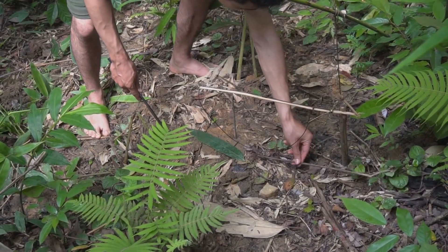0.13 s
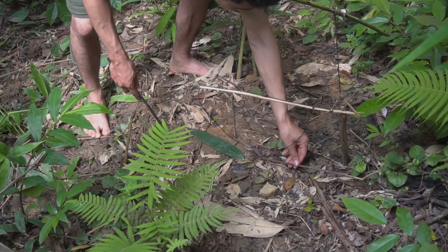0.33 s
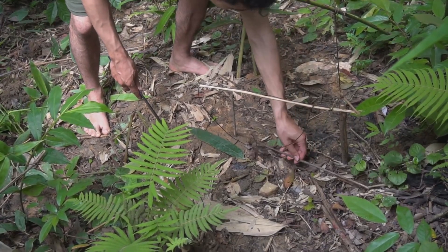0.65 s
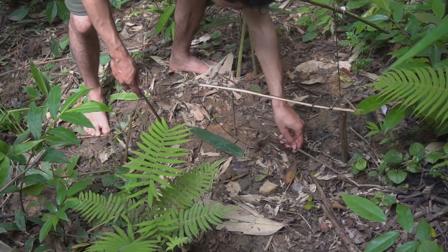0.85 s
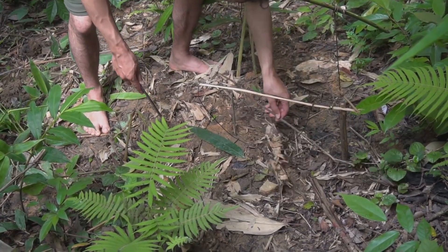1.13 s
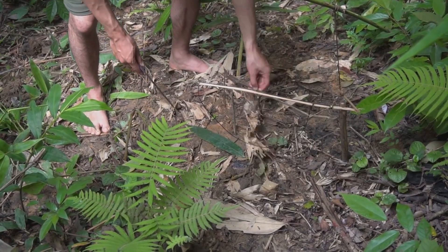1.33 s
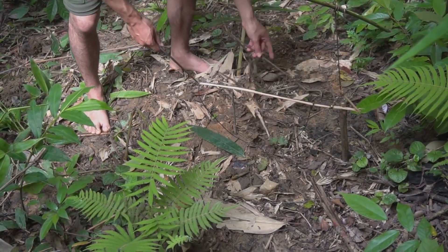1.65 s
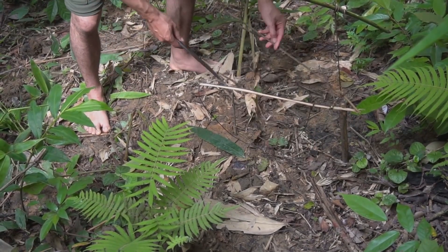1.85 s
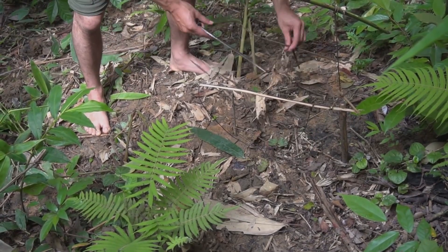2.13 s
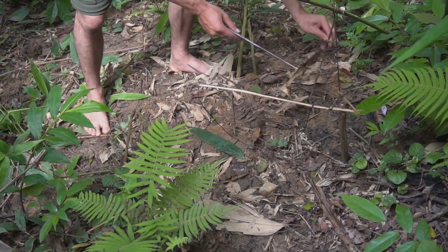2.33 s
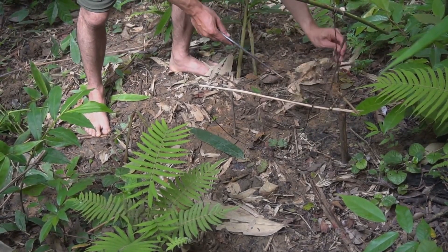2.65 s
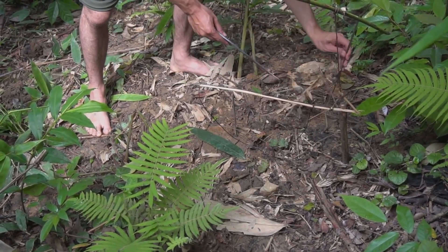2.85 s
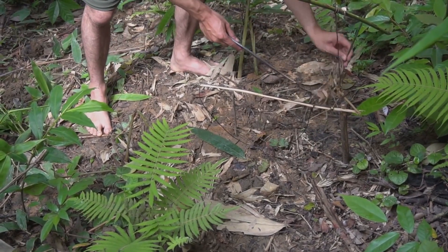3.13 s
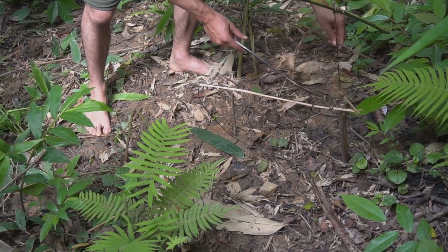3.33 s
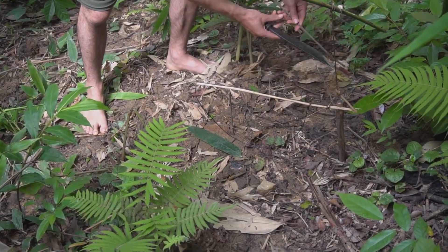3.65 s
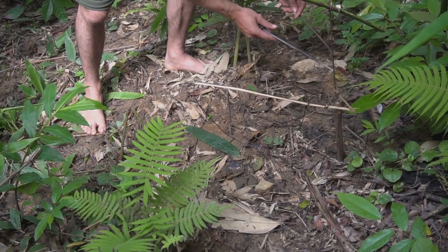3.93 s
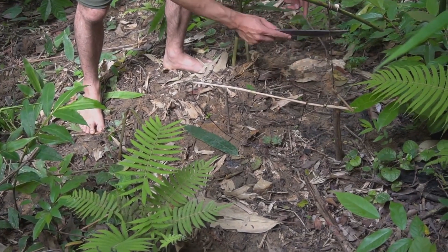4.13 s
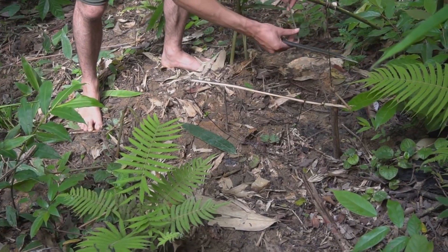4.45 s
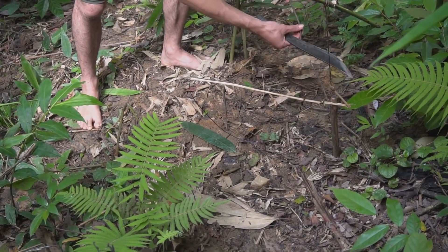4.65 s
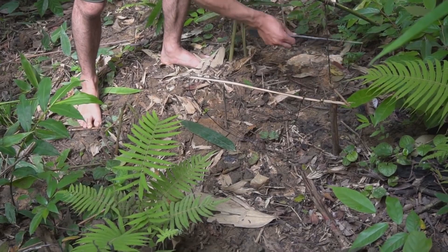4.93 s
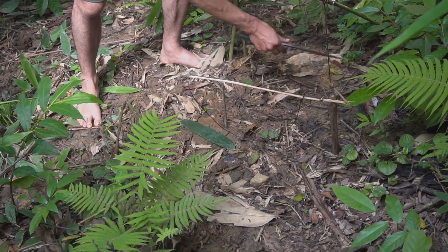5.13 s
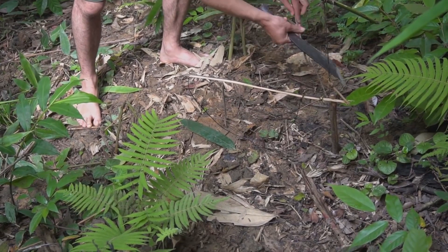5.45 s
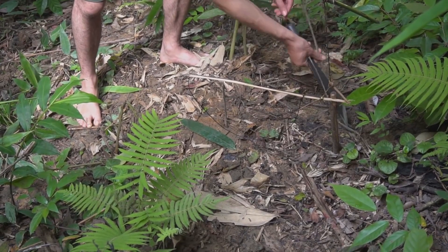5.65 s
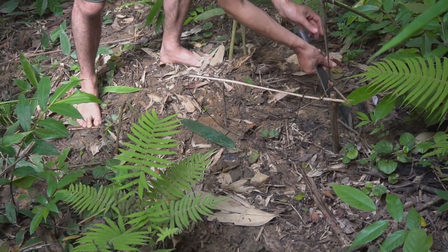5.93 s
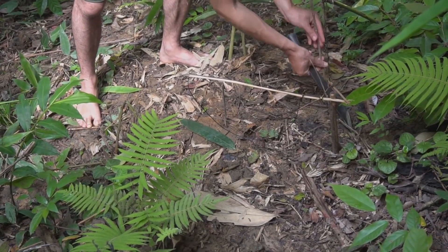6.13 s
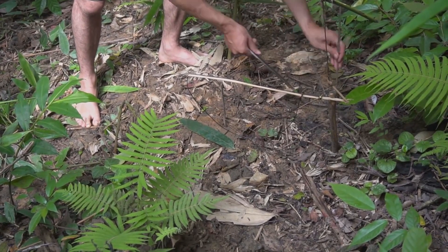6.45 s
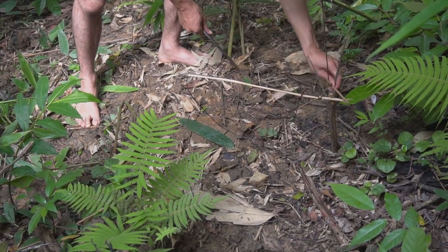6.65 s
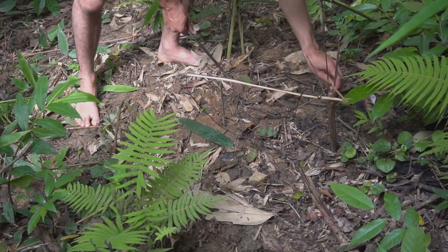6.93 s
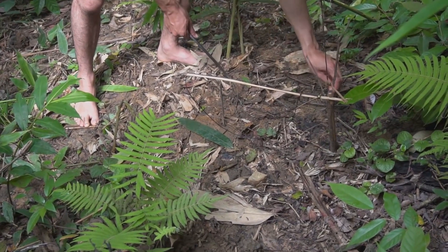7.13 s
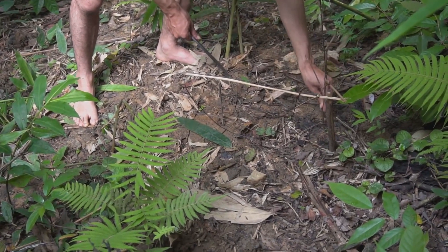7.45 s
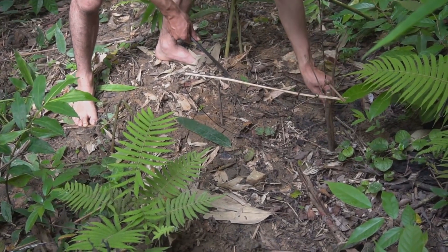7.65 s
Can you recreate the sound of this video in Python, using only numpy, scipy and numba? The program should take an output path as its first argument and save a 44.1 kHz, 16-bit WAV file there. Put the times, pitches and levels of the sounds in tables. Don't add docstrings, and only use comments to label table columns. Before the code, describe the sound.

A dense, shrill cicada chorus fills a tropical forest, several near singers swelling and rising about once a second, leaning slightly left. Close by, hands crunch dry leaves and snap twigs, with firm stem knocks around two seconds. A blade brushes twigs with short bright scrapes, and the loudest crack comes near five seconds. Later the handling thins and a far frog gives soft notes. Stereo microphone a few steps away, outdoors.

```python
import sys
import numpy as np
from scipy import signal
from scipy.fft import rfft, irfft
from scipy.io import wavfile
from scipy.ndimage import uniform_filter1d
from numba import njit

SR = 44100
rng = np.random.default_rng(int(sys.argv[2]) if len(sys.argv) > 2 else 0)


def put_to_file(sound):
    columns = np.atleast_2d(sound).T
    safe = np.clip(columns, -1, 1)
    whole_steps = np.round(safe * 32767)
    wavfile.write(sys.argv[1], SR, whole_steps.astype(np.int16))


def elevation(decibels):
    levels = np.asarray(decibels, float)
    return 10 ** (levels / 20)


N = 343980
TIME = np.arange(N) / SR
WAVER_DB = .5


def level(x, db):
    return x * elevation(db) / np.sqrt(np.mean(x ** 2))


def columns(table):
    s, *values = np.transpose(table)
    return [np.interp(TIME, s, v) for v in values]


def colour(x, points):
    hz, db = np.transpose(points)
    f = np.maximum(np.fft.rfftfreq(x.shape[-1], 1 / SR), 1)
    gain = elevation(np.interp(np.log(f), np.log(hz), db))
    return irfft(rfft(x) * gain, x.shape[-1])


def pan(x, db):
    return x * elevation(np.array([db, -db]).reshape(2, -1) / 2)


def walk(rate):
    k = int(SR / rate)
    steps = np.repeat(rng.standard_normal(N // 100), k)[:N]
    return 1.02 * uniform_filter1d(uniform_filter1d(steps, k), k)


def bump(s, length):
    return np.abs(np.sin(np.pi * np.clip((TIME - s) / length, 0, 1)))


def swells(start, db, rise, hold, fall):
    coarse = TIME[::64]
    t = coarse - np.reshape(start, (-1, 1))
    hold = np.reshape(hold, (-1, 1))
    slope_db = 20 * np.minimum(np.minimum(t / rise - 1, (rise + hold - t) / fall), 0)
    power = np.sum(elevation(2 * (slope_db + np.reshape(db, (-1, 1)))), axis=0)
    return np.interp(TIME, coarse, np.sqrt(power))


@njit
def svf(x, hz, width):
    y, b, l = np.empty(len(x)), 0., 0.
    for i in range(len(x)):
        g, k = np.tan(np.pi * hz[i] / SR), width / hz[i]
        v = (b + g * (x[i] - l)) / (1 + g * (g + k))
        b, l, y[i] = 2 * v - b, l + 2 * g * v, k * v
    return y


@njit
def follow(x, attack, release):
    y, e = np.empty(len(x)), 0.
    for i in range(len(x)):
        e += (x[i] - e) * (attack if x[i] > e else release)
        y[i] = e
    return y


def ring(x, hz, width_hz):
    hz = hz + 0 * TIME
    return svf(svf(x, hz, 1. * width_hz), hz, 1. * width_hz)


def tymbal(rate_hz, uneven):
    timing, loudness = rng.standard_normal((N // 30, 2)).T
    at = np.cumsum(SR / rate_hz * np.maximum(1 + uneven * timing, .1))
    inside = at < N - 2
    size, at = elevation(1.63 * loudness)[inside], at[inside]
    whole, part = at.astype(int), at % 1
    return np.bincount(whole, size * (1 - part), N) + np.bincount(whole + 1, size * part, N)


def forest(x, t60_s, wet_db, sway_hz=8.):
    t = TIME[:SR // 3]
    scatter = rng.standard_normal((3, 2, len(t))) * elevation(-60 * t / t60_s)
    scatter *= elevation(wet_db) / np.sqrt(np.sum(scatter ** 2, axis=2, keepdims=True))
    turn = 2 * np.pi * sway_hz * TIME + 2.0 * walk(2.003)
    share = np.cos(turn + np.arange(3)[:, None] * 2 * np.pi / 3) * np.sqrt(2 / 3)
    return x + signal.oaconvolve((x * share)[:, None], scatter, axes=2).sum(axis=0)[:, :N]


# frequency in Hz, level in dB per Hz.
AIR_SPECTRUM = [(12, -44), (20, -18), (91, -2.5), (255, -7.5), (527, -9), (718, -5), (897, -13), (1190, -6),
                (1810, -6.5), (2140, -3.5), (2820, 0), (4060, -8), (8890, -24.5), (12800, -30),
                (16000, -30)]
# frequency in Hz, side minus mid in dB.
AIR_WIDTH = [(60, -26), (110, -13), (200, -8.5), (380, -4.5), (700, -8.5), (1290, -10), (2380, -6),
             (4400, -2.5), (8120, 4.5), (15000, -2)]


def air():
    mid, side = colour(rng.standard_normal((2, N)), AIR_SPECTRUM)
    side = colour(side, [(25, -24)] + list(AIR_WIDTH))
    side = colour(side, [(30, -8), (60, 0.5)])
    hum = level(ring(rng.standard_normal(N), 77.4, 30), -57.0)
    return level(np.array([mid + side, mid - side]), -37.0) * elevation(1.0 * walk(3.18)) + hum


# time in seconds, level of the upper and of the lowest singers in dB.
CHORUS_LEVEL = [(0, -41, -41), (.6, -37.5, -61), (1.1, -38, -60), (2.1, -47, -48.5), (3.0, -49, -47),
                (3.8, -41, -43.5), (4.6, -45, -43.5), (5.1, -35.5, -56), (5.5, -48, -46), (5.9, -42, -44),
                (6.5, -37, -55), (7.2, -37.5, -57), (7.8, -34.5, -43)]
# frequency in Hz, width in Hz, level in dB.
CHORUS_RESONANCES = [(2400, 550, 0), (2750, 500, -1)]


def chorus():
    db, low_db = columns(CHORUS_LEVEL)
    clicks = sum(tymbal(hz, .3) for hz in (390., 470., 610.))
    upper = sum(elevation(g + 1.0 * walk(5.4)) * level(ring(clicks, hz, width), 0)
                for hz, width, g in CHORUS_RESONANCES)
    lowest = level(ring(clicks, 2140, 246), 0) * elevation(low_db - 4.5)
    far = level(upper, 0) * elevation(db - 7.5) + lowest
    return pan(forest(far, t60_s=0.19, wet_db=5.0), -2.2)


# time in seconds, level in dB, wing resonance in Hz.
KATYDID_COURSE = [(0, -64, 13450), (.75, -61, 13300), (1.5, -65, 13200), (3.0, -65, 13000),
                  (4.3, -73, 13100), (5.5, -78, 13100), (7.8, -80, 13100)]


def katydid():
    db, hz = columns(KATYDID_COURSE)
    hum = ring(tymbal(900., .3), hz + 90 * walk(5), 1400)
    hum = level(hum, 0) * elevation(db - 4.5 + 2.2 * walk(7.1))
    return forest(hum, t60_s=.15, wet_db=12.5)


# start in seconds, length in seconds, level in dB, pitch in Hz.
FROG_NOTES = [
    (5.84, .07, -52, 1540),
    (6.42, .07, -43, 1550),
    (7.297, .055, -42, 1590),
    (7.4, .06, -44, 1530),
]


def frog():
    notes = sum(elevation(db) * bump(s, length) * np.sin(2 * np.pi * hz * TIME) for s, length, db, hz in FROG_NOTES)
    return pan(notes, -1.5)


def cricket():
    trill = level(ring(tymbal(700., .3), 7700, 500), -58) * bump(.42, .2)
    return forest(trill, t60_s=.12, wet_db=3.5)


# time in seconds, level in dB.
EVEN_LEVEL = [(0, -70), (1.8, -69), (1.9, -48), (2.1, -47), (2.45, -43), (2.9, -43.5), (3.3, -42.5),
              (3.6, -37), (3.9, -46), (4.9, -52), (5.1, -46), (5.5, -48), (5.8, -41.5), (6.1, -47),
              (6.6, -49), (7.0, -46), (7.4, -46), (7.8, -48)]


def even_cicada():
    clicks = tymbal(252.8, .006)
    song = level(ring(clicks, 3760, 1400), 0) * elevation(columns(EVEN_LEVEL)[0] + 1.8 * walk(9))
    return pan(forest(song, t60_s=.08, wet_db=2.5, sway_hz=3.), 2.9)


# start in seconds, length in seconds, level in dB.
CLEAR_MOMENTS = [(0.117, 0.085, -34), (.16, 0.085, -38), (.99, 0.13, -46), (1.13, 0.074, -42),
                 (1.227, 0.083, -41), (1.846, 0.065, -36), (1.93, 0.12, -38), (2.847, .092, -35.5),
                 (2.866, .11, -32.5), (3.047, 0.13, -28.5), (3.05, .22, -38), (3.06, 0.13, -39),
                 (3.22, 0.11, -32.5), (3.22, 0.2, -34), (3.24, 0.074, -38), (3.4, .09, -33.5),
                 (3.419, 0.25, -40), (3.438, 0.12, -34), (3.55, 0.096, -35), (3.603, .08, -35),
                 (3.75, 0.072, -34), (4.16, .11, -38), (4.95, .15, -37), (5.2, .09, -41),
                 (5.248, 0.094, -34.5), (5.614, 0.15, -34), (5.67, 0.12, -33.5), (5.877, 0.12, -31.5),
                 (5.9, 0.22, -35), (6.44, .12, -31.5), (6.47, .12, -31), (6.62, .11, -39), (7.3, 0.11, -34),
                 (7.372, 0.11, -35), (7.46, 0.1, -30.5), (7.477, .1, -34), (7.73, 0.11, -37)]
CLEAR_PITCHES = (3950, 3590, 3280, 4070, 4170, 3285, 3280, 4305, 4050, 4050, 4304, 3535, 3540, 4055, 3797,
                 3530, 3790, 4040, 3525, 3270, 4250, 3850, 3790, 3280, 3910, 3320, 3820, 3280, 3775, 3670,
                 3250, 3730, 3270, 3760, 3270, 3920, 3250)


def clear_harmonics():
    flutter = .7 * walk(40)
    phases = 0.71 * rng.standard_normal((40, 2, 1))
    clear = sum(elevation(db) * bump(s, length) * np.sin(2 * np.pi * hz * TIME + phase + flutter)
                for (s, length, db), hz, phase in zip(CLEAR_MOMENTS, CLEAR_PITCHES, phases))
    return pan(clear * elevation(2.2 * walk(45)), 3.4)


# start in seconds, length in seconds, level in dB.
SHRILL_CALLS = [
    (2.3, 0.49, -61),
    (3.75, 0.77, -56.5),
    (5.197, 0.47, -51),
    (6.2, 0.51, -56.5),
    (6.95, .3, -59),
    (7.4, .4, -53.5),
]


def shrill(clicks):
    start, length, db = np.transpose(SHRILL_CALLS)
    return level(ring(clicks, 6260, 1100), 0) * swells(start, db, rise=0.13, hold=length, fall=0.26)


# start in seconds, length in seconds, level in dB.
WHISTLE_CALLS = [(.08, 0.18, -49), (0.267, 0.19, -44.5), (.5, 0.069, -49), (1.37, 0.19, -45.5),
                 (1.616, 0.073, -47.5), (2.55, 0.34, -60), (3.55, 0.44, -55), (5.95, .2, -54),
                 (7.05, 0.17, -51)]


def whistles(clicks, others):
    start, length, db = np.transpose(WHISTLE_CALLS)
    tone = ring(clicks, 4740, 300) + elevation(3.0) * ring(others, 4880, 300) + elevation(-5.0) * ring(clicks, 5360, 850)
    return level(tone, 0) * swells(start, db, rise=0.047, hold=length, fall=.08)


# time in seconds, gain in dB.
ABDOMEN_THROBS = [(2.12, 0), (2.25, -10), (2.4, -1.5), (2.72, 1), (2.9, 4), (3.14, 1), (3.36, 1), (3.55, 4),
                  (3.82, 3), (4.1, 2), (4.28, 2.5), (4.53, 3.5), (4.7, 3.5), (4.8, 5), (5.1, 4),
                  (5.29, 2.5), (5.48, 7), (5.74, -2), (6.0, 2.5), (6.1, 2.5), (6.25, 1.5), (6.5, 2),
                  (6.73, 4), (6.9, 2), (7.08, 5.5), (7.18, 6.5), (7.38, 1.5), (7.5, 3), (7.7, 2)]


def throbs():
    coarse = TIME[::64]
    gain_db = sum(db * np.exp(-((coarse - s) / 0.065) ** 2) for s, db in ABDOMEN_THROBS)
    return np.interp(TIME, coarse, gain_db)


# time in seconds, level in dB, left minus right in dB.
DRONE_COURSE = [(0, -37, 4), (.2, -41.5, 6), (.45, -68, 1), (.8, -43, 0), (1.4, -42.5, 5), (1.8, -82, 2.5),
                (1.89, -43, 9), (2.2, -39, 5), (2.5, -36.5, 4.5), (3.4, -40, 3), (4.9, -35.5, 5.5),
                (5.08, -29, -2), (5.5, -34.5, -1), (6.3, -32, -0.5), (6.9, -38, 2), (7.15, -34.5, 1),
                (7.45, -33, -2), (7.8, -38, -1.5)]


def drone(clicks, throb_db):
    db, pan_db = columns(DRONE_COURSE)
    song = level(ring(clicks, 3265, 1270) + elevation(-9.0) * ring(clicks, 3290, 350), 0)
    song = song * elevation(db - 4.0 + 0.062 * throb_db + WAVER_DB * walk(8.3))
    return pan(forest(song, t60_s=0.36, wet_db=4.5), pan_db)


# time in seconds, level in dB, resonance in Hz.
SONG_COURSE = [(0, -60, 3300), (1.8, -72.5, 3320), (1.88, -38, 3300), (2.03, -34, 4010), (2.5, -34.5, 3950),
               (3.0, -41, 3850), (3.8, -33, 3850), (4.5, -36.5, 3820), (5.0, -34, 3730), (5.6, -40, 3770),
               (6.1, -36.5, 3770), (6.6, -34.5, 3730), (6.9, -41.5, 3740), (7.3, -37.5, 3750),
               (7.8, -36.5, 3730)]


def steady_cicada(clicks, throb_db):
    db, hz = columns(SONG_COURSE)
    song = level(ring(clicks, hz, 1030) + elevation(-8.0) * ring(clicks, hz, 410), 0)
    return song * elevation(db - 3.5 + throb_db + WAVER_DB * walk(10))


# start in seconds, level in dB, level of the stretched abdomen in dB.
RISING_PHRASES = [
    (-.18, -30.5, -45.5),
    (.92, -29.5, -48),
    (2.17, -38, -42.5),
    (3.3, -36, -41),
    (4.45, -45, -39.5),
    (5.6, -56, -39.5),
    (6.76, -40, -42.5),
]


def rising_cicada(clicks):
    start, db, _ = np.transpose(RISING_PHRASES)
    since = TIME - start[np.searchsorted(start, TIME) - 1]
    start_hz, end_hz, late_s, climb_s = 2830, 3920, 0.068, .19
    hz = end_hz - (end_hz - start_hz) * np.clip(1 - (since - late_s) / climb_s, 0, 1)
    return level(ring(clicks, hz, 1100), 0) * swells(start, db - 6.5, rise=.2, hold=0.17, fall=0.21)


def strained_abdomen(clicks, others):
    start, _, db = np.transpose(RISING_PHRASES)
    strain = swells(start + 0.09, db, rise=0.24, hold=0.27, fall=0.27)
    high = level(ring(clicks, 4750, 1150), 0) * (strain * elevation(-5.5) + elevation(-55.5))
    edge = level(ring(others, 5780, 1500), 0) * (strain * elevation(-14.5) + elevation(-61.5))
    return high + edge


def cicadas():
    clicks = tymbal(506., .2) + tymbal(540., .25)
    others = tymbal(506., .2) + tymbal(470., .25)
    throb_db = throbs()
    body = steady_cicada(clicks, throb_db) + rising_cicada(others)
    high = strained_abdomen(clicks, others) + whistles(clicks, others) + shrill(others)
    out = pan(forest(body, t60_s=0.18, wet_db=3.5), 2.5) + drone(others, throb_db)
    return out + clear_harmonics() + pan(forest(high, t60_s=0.19, wet_db=2.5), 2.1)


# time in seconds, level in dB.
STIR_LEVEL = [(0, -50.5), (.7, -55.5), (1.9, -53), (2.5, -51), (2.95, -49.5), (3.2, -53), (3.9, -51),
              (4.4, -54), (5.6, -54.5), (6.0, -53), (6.8, -57), (7.3, -52.5), (7.8, -55.5)]
# start in seconds, length in seconds, level in dB, weight of heavy stems in dB.
HANDFULS = [(0.75, 0.17, -49.5, -7), (0.92, 0.068, -39.5, -22), (1.017, 0.11, -41.5, -20),
            (1.14, 0.13, -44, -28), (1.341, 0.057, -37, -8), (1.43, 0.14, -50.5, -22),
            (1.623, 0.12, -51.5, -17), (2.136, .05, -58, -12), (2.188, 0.02, -44, -18),
            (2.298, 0.1, -43.5, -9), (2.704, 0.073, -59, -2), (2.957, 0.084, -46, -29),
            (3.512, 0.036, -60, -6), (3.66, 0.13, -46.5, -4), (4.046, .05, -57, 0.),
            (4.412, 0.024, -44, -18), (4.73, 0.049, -49, -22), (4.855, 0.055, -50, -21),
            (4.93, 0.059, -36.5, -34), (5.038, 0.056, -41.5, -14), (5.127, 0.093, -51, -15),
            (5.497, .06, -54, -5), (5.603, .03, -58, 9), (5.709, 0.048, -37, -17), (5.85, 0.028, -43, -15),
            (6.836, 0.027, -52, -17), (6.887, 0.023, -57, -7), (7.005, 0.041, -49.5, -4),
            (7.297, 0.089, -45.5, -3), (7.496, 0.032, -50, -7)]
# start in seconds, length in seconds, level in dB.
LEAF_BRUSHES = [(.56, 0.053, -54), (4.2, 0.14, -54), (6.1, 0.036, -58), (4.6, 0.074, -62),
                (1.26, .16, -37.5), (5, .08, -62), (6.66, 0.07, -52), (7.655, 0.07, -53), (2.55, 0.17, -62),
                (3.3, .09, -62), (2.7, 0.056, -50), (6.4, 0.055, -49), (5.9, 0.068, -56), (1.5, 0.076, -62)]
# frequency in Hz, level in dB per Hz.
LEAF_SPECTRUM = [(600, -19), (2000, 0), (5000, 7), (8000, 7), (11000, 7), (14000, 5), (16000, -3)]
# frequency in Hz, level in dB per Hz.
STEM_SPECTRUM = [(150, -4.5), (500, -0.5), (1500, -1), (3000, -17), (6000, -39.5)]


def litter():
    start, hold, db, stem_db = np.transpose(HANDFULS)
    grab_s, settle_s = 0.016, 0.049
    leaves = elevation(columns(STIR_LEVEL)[0]) + swells(start, db, grab_s, hold, settle_s)
    leaves += sum(elevation(g) * bump(s, length) for s, length, g in LEAF_BRUSHES)
    stems = elevation(-50.5) + swells(start, db + stem_db - 6.0, grab_s, hold, settle_s)
    strength = np.minimum(rng.exponential(size=N // 24 + 1), 4)
    grains = rng.standard_normal((2, N)) * elevation(1.7 * strength).repeat(24)[:N]
    mid, side = level(colour(grains, LEAF_SPECTRUM), 0) * leaves + level(colour(grains, STEM_SPECTRUM), 0) * stems
    side = side * elevation(-4.0)
    return pan(np.array([mid + side, mid - side]), -3.0)


# start in seconds, peak in dB, centre in Hz, left minus right in dB.
STEM_KNOCKS = [
    (1.282, -28, 1310, -1.0),
    (1.39, -34, 552, 1),
    (2.203, -24, 2300, 0),
    (2.221, -34, 910, -1),
    (2.221, -19, 2570, -3),
    (3.718, -30, 1510, 1),
    (3.768, -32, 790, 4),
]


def knocks():
    t, out = TIME[:SR // 10], np.zeros((2, N))
    for (s, peak_db, hz, pan_db), noise in zip(STEM_KNOCKS, rng.standard_normal((12, 2, len(t)))):
        modes = np.sin(2 * np.pi * hz * t) + elevation(-6) * np.sin(2 * np.pi * hz * 1.6 * t)
        modes = modes * np.minimum(t * hz, 1) * elevation(-60 * t * hz / 24)
        shape = [(hz / 6, -24), (hz / 2.5, -3), (hz * 1.9, -3), (hz * 6, -18)]
        burst = level(colour(noise[0] + .6 * noise, shape), -8.5)
        burst = burst * np.minimum(t / .003, 1) * elevation(-20 * t / .03)
        i = int(s * SR)
        out[:, i:i + len(t)] += pan((modes + burst) * elevation(peak_db), pan_db)
    return out


# frequency in Hz, level in dB, decay by 60 dB in seconds.
BLADE_MODES = [(8110, -26, .07), (10680, -5, .07), (13065, 0, .075), (14450, -20, .06), (14940, -20, .06),
               (15415, -14, .07)]
# start in seconds, scrape length in seconds, level in dB, tilt in dB per kHz.
BLADE_SCRAPES = [
    (4.425, .045, -26.5, .1),
    (4.92, .02, -36, .1),
    (5.07, .08, -46, -5.),
    (5.59, .03, -40, -5.),
    (5.72, .02, -38, .5),
    (5.755, .025, -33, .5),
]


def blade():
    t, out = TIME[:SR // 2], np.zeros((2, N))
    for (s, length, db, tilt), noise in zip(BLADE_SCRAPES, rng.standard_normal((9, 2, len(t)))):
        push = np.sin(np.pi * np.clip(t / length, 0, 1)) * (noise[0] + .5 * noise)
        i = int(s * SR)
        for hz, g, t60 in BLADE_MODES:
            decay = elevation(-60 * t / t60) * np.sin(2 * np.pi * hz * t)
            mode = signal.fftconvolve(push, decay[None], axes=1)[:, :len(t)]
            mode_db = db + g + tilt * (hz / 1000 - 11.5)
            out[:, i:i + len(t)] += mode * elevation(mode_db) / np.abs(mode).max()
    return pan(out, -8.0)


# start in seconds, peak in dB, centre in Hz, left minus right in dB.
TWIG_SNAPS = [(0.913, -21, 7000, -3.0), (0.95, -19.5, 9850, -3.0), (0.9574, -22, 8510, -3.0),
              (0.985, -20, 10800, -6), (1.044, -18.5, 7110, -5), (1.464, -23, 8830, -1.5),
              (1.7684, -26, 11900, -2.0), (1.8064, -25, 10600, -1.5), (2.4109, -25, 10600, -2.5),
              (2.7087, -30, 7950, -2.0), (2.7503, -23, 7010, -0.5), (2.9731, -23, 12800, -10),
              (3.5718, -26, 7400, -1.5), (3.7275, -20.5, 7100, 0.0), (4.784, -32, 8110, -2.5),
              (4.8653, -22, 13100, -4), (4.9188, -12, 11200, -4), (4.923, -7, 7980, -4),
              (4.928, -4, 14900, -5), (4.966, -14, 11500, -2.0), (5.0665, -21.5, 9650, -2.0),
              (5.478, -25.5, 11200, -4), (5.5403, -26, 11300, -1.0), (5.6226, -24, 10500, -2.5),
              (5.7359, -21, 8810, -5), (5.7646, -18, 13000, -3), (5.8716, -20, 10800, -3.0),
              (6.838, -30, 9300, -5), (6.905, -30, 11000, -2.0), (7.3831, -26, 7170, -2.0)]
# start in seconds, peak in dB, centre in Hz.
SMALL_CRACKLES = [(0.7764, -34, 14000), (0.832, -29, 11600), (1.0874, -21.5, 12000), (1.3034, -23, 12000),
                  (1.3104, -24, 11800), (1.3284, -23, 8540), (1.3514, -24, 11000), (1.4, -21, 7530),
                  (1.5004, -31, 11200), (1.6534, -37, 8620), (1.7104, -29, 10900), (1.7354, -27, 8160),
                  (2.1755, -27, 7240), (2.2029, -28, 10400), (2.221, -23, 9700), (2.3002, -29, 7530),
                  (2.3104, -29, 11500), (2.3254, -30, 12700), (2.3844, -29, 8550), (2.4384, -30, 10800),
                  (2.7364, -28, 7030), (2.8744, -31, 13300), (3.5184, -34, 7090), (3.5369, -27, 7050),
                  (3.7174, -27, 7130), (3.7374, -24, 7010), (3.7704, -29, 11900), (4.9994, -28, 13400),
                  (5.0764, -26, 10000), (5.1534, -27, 10700), (5.2614, -29, 7440), (5.8934, -26, 11100),
                  (6.1634, -34, 7290), (6.8463, -29, 8080)]


def snaps():
    t, out = TIME[:SR // 20], np.zeros((2, N))
    events = list(TWIG_SNAPS) + [(*crackle, -2.5) for crackle in SMALL_CRACKLES]
    for (s, peak_db, hz, pan_db), noise in zip(events, rng.standard_normal((80, 2, len(t)))):
        crack = noise[0] * elevation(-60 * t / 0.011) + noise * elevation(-7.5 - 60 * t / 0.11)
        shape = [(hz / 5, -30), (hz / 1.65, -8), (hz, 0), (hz * 1.53, -6), (hz * 8.9, -22)]
        crack = colour(crack * np.minimum(t / .0018, 1), shape)
        i = int(s * SR)
        out[:, i:i + len(t)] += pan(crack / np.abs(crack).max() * elevation(peak_db - 1.0), pan_db)
    return out


def scene():
    far = air() + chorus() + katydid() + frog() + cricket()
    singers = even_cicada() + cicadas()
    hands = litter() + knocks() + blade() + snaps()
    return far + singers + hands


def low_pass(x):
    return signal.sosfilt(signal.butter(12, 15860, fs=SR, output="sos"), x)


def record(dry):
    envelope = follow(np.abs(dry).max(axis=0), 1 / (0.00039 * SR), 1 / (.13 * SR))
    gain = np.minimum(1, elevation(-18.5) / (envelope + 1e-9)) ** 0.78
    mix = np.tanh(dry * gain / .6) * .6
    return low_pass(mix)


dry = scene()
out = record(dry)
put_to_file(out)
```